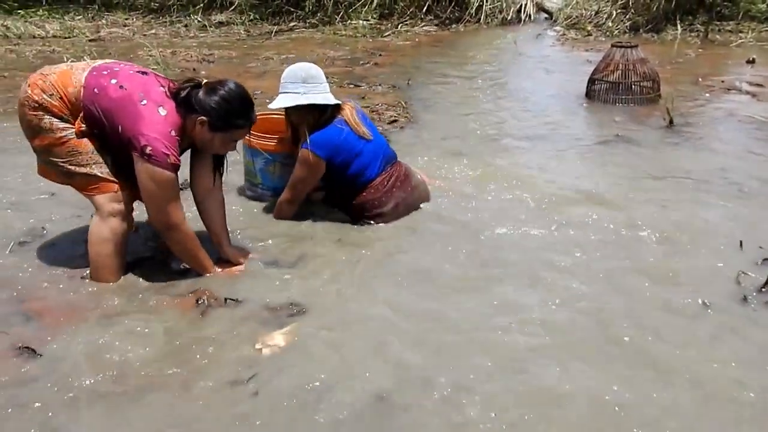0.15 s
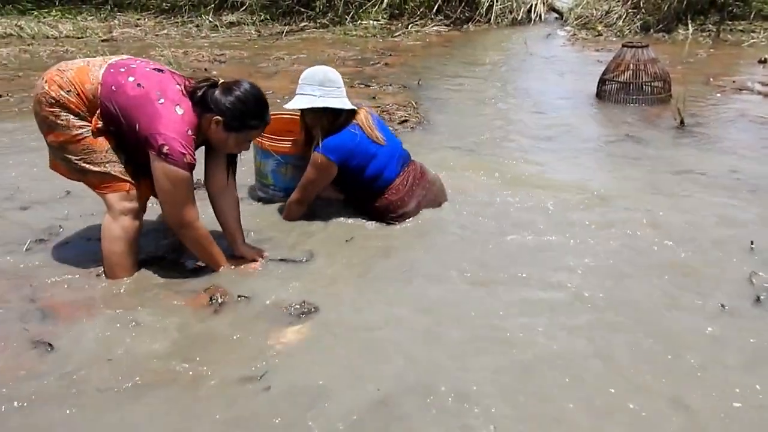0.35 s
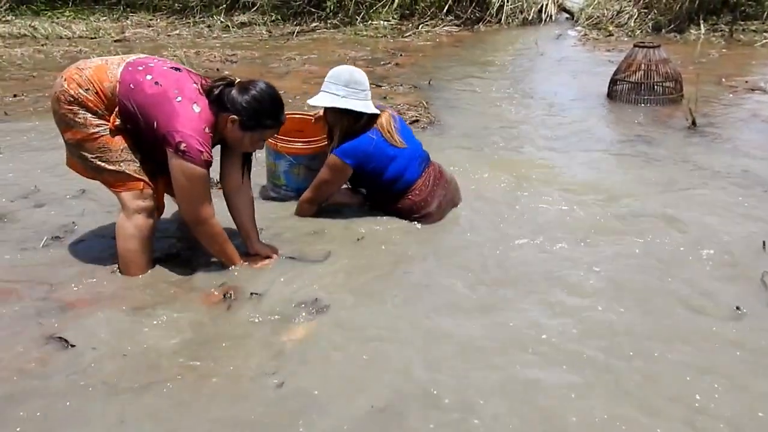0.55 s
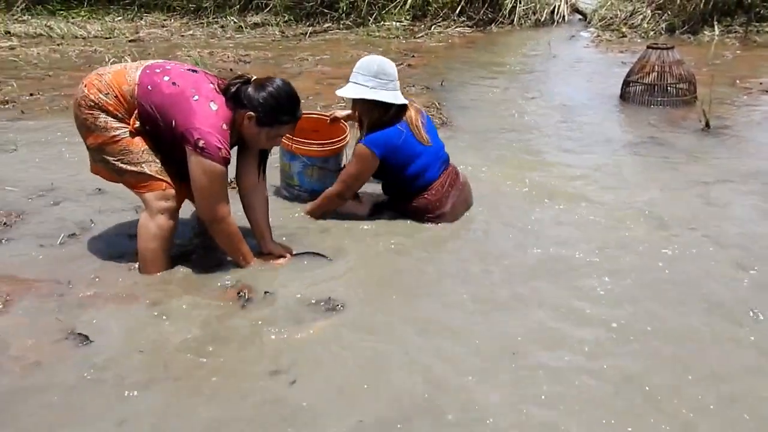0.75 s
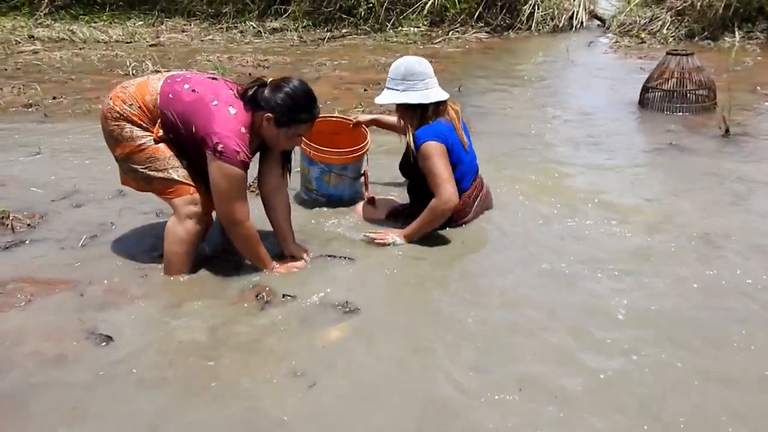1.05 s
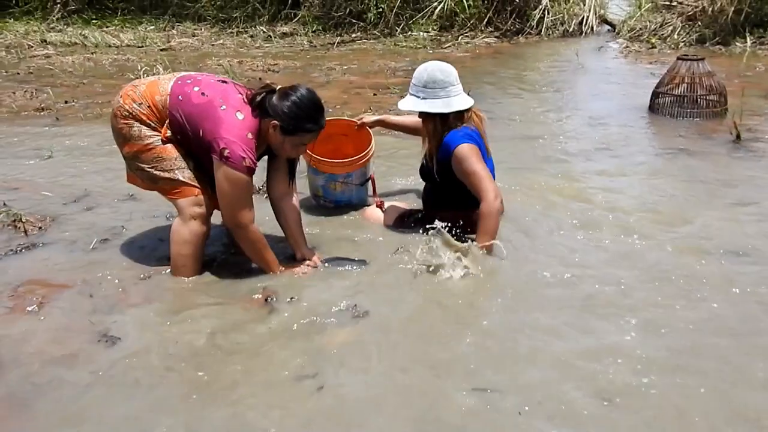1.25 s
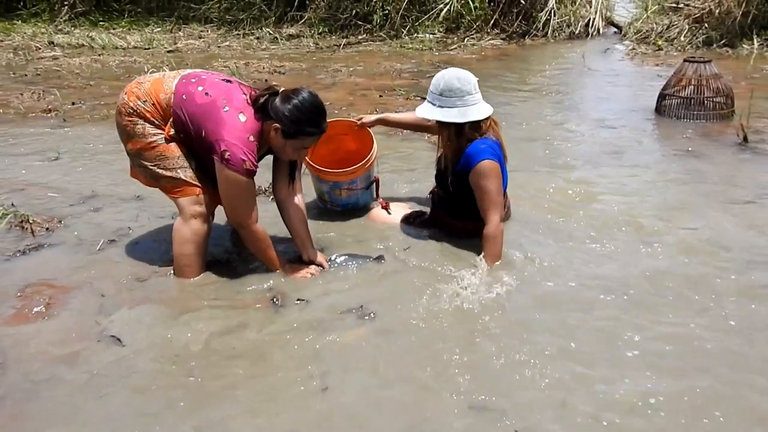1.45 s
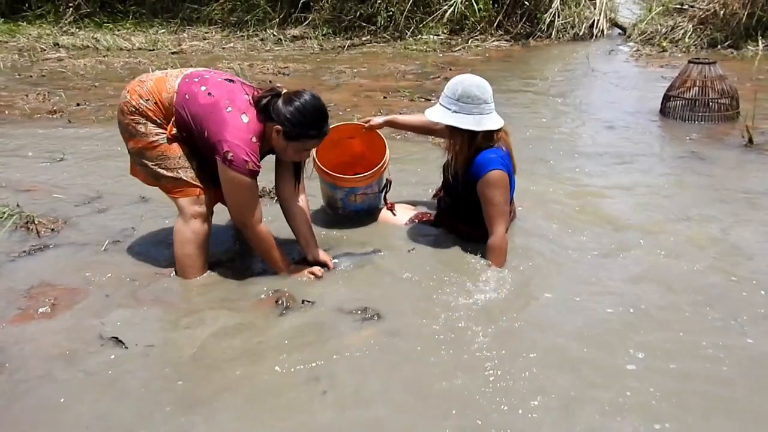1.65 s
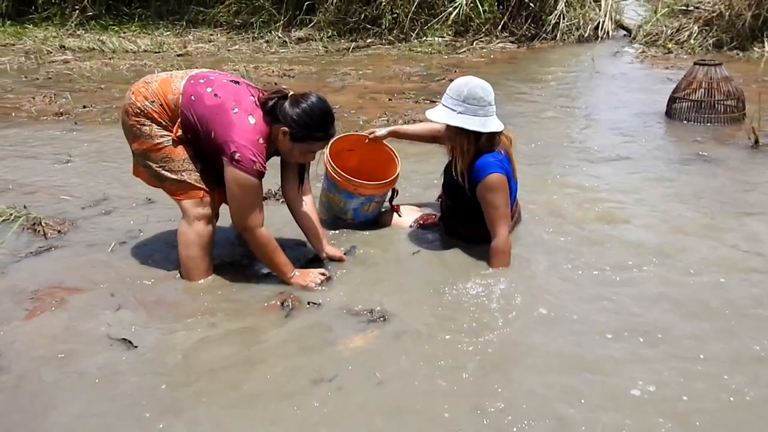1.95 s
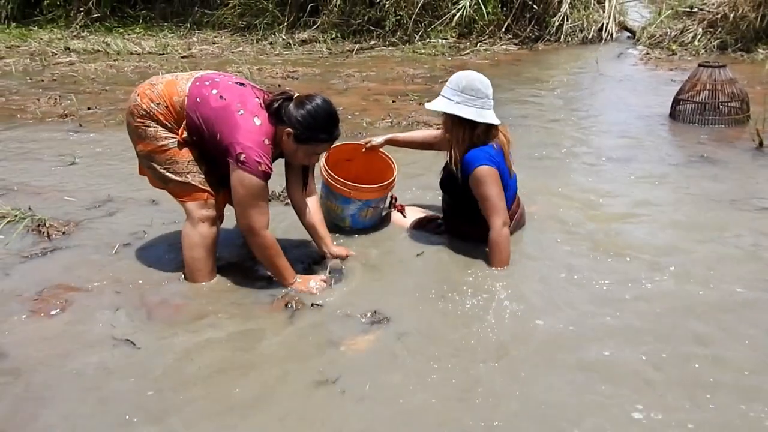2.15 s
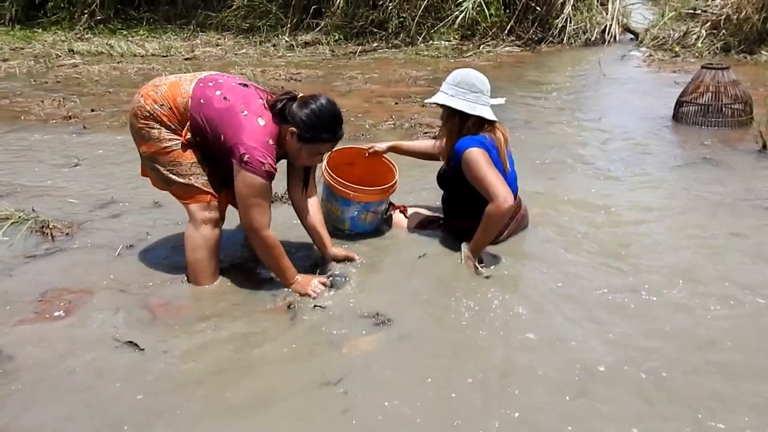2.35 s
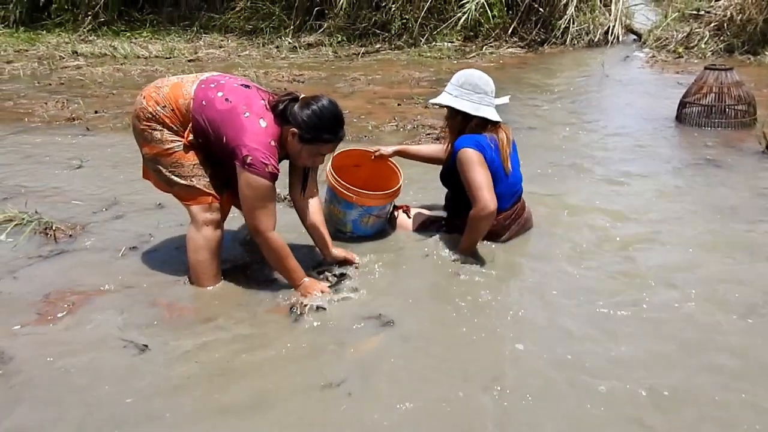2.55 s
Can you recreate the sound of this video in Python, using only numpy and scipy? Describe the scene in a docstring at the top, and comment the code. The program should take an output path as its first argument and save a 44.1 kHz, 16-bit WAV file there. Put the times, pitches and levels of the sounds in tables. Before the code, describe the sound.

Muddy water sloshes and plips under groping hands while low wind thumps swell into a rough gust

```python
"""Shallow muddy water stirred by hands and legs, outdoors: splashes of fine grains, droplets, low
bubbles, a plop and gulps, made of damped sines and upward sweeps, most with a short scattered echo.
Wind buffets two microphone ports: gusts of shaped noise, single thumps, and sharp snaps near the end.
A steady filtered-noise hiss lies beneath; a limiter turns the gain down on strong low-pitched peaks."""
import sys
import numpy as np
from scipy import signal
from scipy.fft import rfft, irfft, next_fast_len
from scipy.io import wavfile
from scipy.ndimage import uniform_filter1d, minimum_filter1d, map_coordinates

SR = 44100
rng = np.random.default_rng(int(sys.argv[2]) if len(sys.argv) > 2 else 0)


def store_wav(level_fs):
    """Save 16-bit WAV to argv[1]."""
    pcm = np.round(np.clip(np.atleast_2d(level_fs), -1, 1) * 32767)
    wavfile.write(sys.argv[1], SR, pcm.T.astype(np.int16))


N = 119070

# Hiss spectrum, relative: (frequency [Hz], density [dB per Hz])
HISS_SPECTRUM = [(150, -22.5), (273, -9), (413, -11), (563, -5), (810, -11), (1110, -8.5), (3400, -9),
                 (6670, -1.5), (15600, -40.5)]
# Left-right correlation of the hiss: (frequency [Hz], correlation [-1 to 1])
HISS_CORRELATION = [(200, 0.84), (1700, 0.86), (5000, 0.73), (12000, 0)]
# Gust level at each port: (time [s], left level [dB], right level [dB])
GUST_LEVELS = [(0, -36, -42.5), (.3, -43, -42), (0.451, -38.5, -36.5), (0.504, -16.5, -29.5),
               (0.629, -32, -20.5), (.68, -29.5, -65), (0.803, -22, -15.5), (.95, -25.5, -32.5),
               (1.08, -25.5, -16.5), (1.178, -22.5, -14.5), (1.23, -34, -38.5), (1.32, -36.5, -22),
               (1.4, -26, -31.5), (1.46, -24, -23), (1.62, -34.5, -24), (1.8, -32.5, -32),
               (1.86, -27.5, -24), (2.05, -32, -30.5), (2.251, -30.5, -24), (2.303, -13.5, -16.5),
               (2.361, -23.5, -35), (2.408, -19.5, -12.5), (2.441, -10.5, -17), (2.562, -6.5, -8),
               (2.59, -31, -7), (2.609, -1, -14), (2.7, -2, -6)]
# Rumble spectrum of the wind, relative: (frequency [Hz], density [dB per Hz])
RUMBLE_SPECTRUM = [(20, -67), (54, 3), (135, 1.5), (209, -8.5), (264, -23), (330, -27), (430, -68)]
# Bright edge of strong gusts, relative: (frequency [Hz], density [dB per Hz])
EDGE_SPECTRUM = [(100, -47), (200, 7.5), (350, -4), (800, -19.5), (2500, -54)]
# Single thumps of wind: (start [s], nominal peak, mean of both ports [dB], left minus right [dB])
WIND_THUMPS = [(0.312, -26, -11), (0.472, -27, -27.5), (0.513, -23, 29), (0.537, -20.5, 15.5),
               (0.711, -16, 3), (0.75, -12.5, -11), (0.835, -4, -10), (0.894, -17, -2), (1.052, -12, -9),
               (1.085, -15.5, -8.5), (1.156, -17.5, -22), (1.421, -14, -5), (1.434, -15.5, -24.5),
               (1.479, -15, -9), (1.527, -13.5, 0), (1.604, -18.5, -11), (1.93, -17, -5), (2.325, -15, 21)]
# Snaps of the windward membrane in the last gust: (time [s], peak [dB])
MEMBRANE_SNAPS = [(2.5025, -11), (2.581, -17), (2.585, -11), (2.6135, -11), (2.623, -9), (2.642, -12),
                  (2.655, -14), (2.673, -12), (2.681, -11)]
# Splashes: (start [s], length [s], rms over the length before colour [dB], median grain pitch [Hz])
SPLASH_CLOUDS = [(0.028, 0.1, -52, 1200), (0.958, 0.08, -45.5, 2595), (1.107, 0.045, -41.5, 5480),
                 (1.228, 0.017, -37.5, 6080), (1.241, 0.21, -42, 1070), (1.398, 0.055, -38.5, 5600),
                 (1.41, 0.076, -38, 2213), (1.454, 0.18, -42, 1110), (1.457, 0.05, -44.5, 5340),
                 (1.575, 0.038, -40, 4450), (2.32, .025, -41.5, 790), (2.345, 0.025, -48, 5620),
                 (2.372, 0.26, -38.5, 1526), (2.498, 0.057, -39.5, 5330), (2.6, 0.064, -38, 2090)]
# Microphone colour on splashes and trickle: (frequency [Hz], gain [dB])
SPRAY_COLOUR = [(1000, 1.5), (3000, 1), (6500, 9.5), (9000, 1.5), (15000, -25)]
# Droplets: (start [s], level before DROP_TRIM_DB [dB], pitch [Hz])
DROPLETS = [(0.0432, -20, 5830), (0.8852, -24, 5270), (0.9092, -23, 4570), (1.016, -19, 4500),
            (1.122, -18, 6860), (1.1428, -16, 6350), (1.234, -18.5, 4620), (1.2869, -12, 6700),
            (1.4108, -11, 7400), (1.4394, -19, 4970), (1.5847, -11, 7800), (1.6037, -17, 7400),
            (2.122, -22, 4850), (2.3082, -20, 3840), (2.319, -19, 3940), (2.3477, -19, 6480),
            (2.361, -7.5, 6320), (2.424, -19.5, 6560), (2.457, -26.5, 3750), (2.494, -13.5, 3020),
            (2.5182, -15.5, 5130), (2.54, -31, 6660), (2.605, -12, 6330)]
# Low bubbles: (start [s], nominal peak [dB], starting pitch [Hz])
LOW_BUBBLES = [(0.043, -34, 975), (0.077, -35, 560), (0.639, -26.5, 970), (0.699, -30, 554),
               (1.136, -26, 1613), (1.285, -31, 1075), (1.318, -20.5, 664), (1.351, -26, 657),
               (1.369, -17.5, 1012), (1.416, -19.5, 1640), (1.43, -21, 1080), (1.47, -26.5, 575),
               (1.516, -26.5, 1116), (1.594, -24.5, 1020), (2.122, -31.5, 545), (2.255, -23, 1770),
               (2.371, -22, 1715), (2.415, -20.5, 1060), (2.467, -32, 1100)]
# A hand enters the water: (start [s], nominal peak [dB], starting pitch [Hz], 60 dB decay [s])
HAND_PLOP = [(1.422, -8, 254, 0.032)]
# Closing cavities: (start [s], length [s], from [Hz], to [Hz], peak [dB], lateness of sweep [exponent])
CAVITY_GULPS = [(.385, .07, 380, 1500, -30.5, 2.3), (2.514, .04, 700, 1700, -24.5, 1.1)]

HISS_DB = -41.5
LUMP_DB, LUMPS_PER_S = 4.5, 28
EDGE_DB, EDGE_REF_GUST_DB = -19, -9.5  # edge level in a gust of the reference level
EDGE_DB_PER_GUST_DB = 1.98
THUMP_HZ, THUMP_WIDTH_CYCLES, THUMP_DELAY_S = 138.8, 0.66, 0.0048  # delay: start to middle
SNAP_HALF_WIDTH_S = .0002

TRICKLE_PER_S, TRICKLE_DB, TRICKLE_HZ = 280, -55.5, 1200
GRAINS_PER_S_PER_HZ = .6  # finer spray is denser
GRAIN_T60_CYCLES = 35
GRAIN_OCTAVES, GRAIN_SCATTER_DB = .85, 5.5  # scales of the random pitch and level
DROP_PARTS, DROP_SPREAD, DROP_SMEAR_S = 5, 0.05, 0.003
DROP_TRIM_DB, DROP_PART_DB, DROP_T60_S = -8.5, -7, 0.016  # part level is relative to the main ping
BUBBLE_T60_CYCLES = 32
RISE = 0.13  # fractional phase stretch at t60: pitch has risen by twice this
ECHO_DB, ECHO_T60_S, ECHO_CORRELATION = -10, .035, 0.62

LIMIT_DB, HOLD_S, GLIDE_S, LAG_S = -5.5, .016, .008, .002
TOP_HZ = 15750


def amp(db):
    """Amplitude from dB."""
    return 10 ** (np.asarray(db) / 20)


def unit(x):
    """x scaled to an rms of 1 over all channels."""
    return x / np.sqrt(np.mean(x ** 2) + 1e-20)


def along(points, hz):
    """Interpolate (frequency [Hz], value) points on a log frequency axis."""
    f, v = np.transpose(points)
    return np.interp(np.log(hz + 1), np.log(f + 1), v)


def wobble(knots_per_s):
    """Two independent smooth random curves."""
    at = np.arange(N) * knots_per_s / SR
    return np.array([map_coordinates(rng.standard_normal(1000), [at]) for _ in range(2)])


def filtered(x, response):
    """Filter x by a zero-phase gain given as a function of Hz."""
    m = next_fast_len(N + SR // 2)
    return irfft(rfft(x, m) * response(np.fft.rfftfreq(m, 1 / SR)), m)[..., :N]


def rush(spectrum, correlation):
    """Stereo noise of rms 1; the mid-side balance sets the left-right correlation."""
    def mid_side_gain(hz):
        angle = np.arccos(np.clip(along(correlation, hz), -1, 1)) / 2
        return amp(along(spectrum, hz)) * [np.cos(angle), np.sin(angle)]

    mid, side = filtered(rng.standard_normal((2, N)), mid_side_gain)
    return unit(np.array([mid + side, mid - side]))


def pings(s, db, hz, t60, size):
    """Sum of damped sines, each with a soft start and a rising pitch."""
    s, db, hz, t60 = (np.asarray(c)[:, None] for c in (s, db, hz, t60))
    t = np.arange(size) / SR
    envelope = amp(db - 60 * t / t60) * (1 - np.exp(-t * hz))
    wave = envelope * np.sin(2 * np.pi * hz * t * (1 + RISE * t / t60))
    at = np.round(s * SR).astype(int) + np.arange(size)
    return np.bincount(at.ravel(), wave.ravel(), N + SR)[:N]


def hiss():
    """Steady shaped noise, less alike left to right in the treble."""
    return amp(HISS_DB) * rush(HISS_SPECTRUM, HISS_CORRELATION)


def gusts(gust_db):
    """Lumpy rumble, weakly related at the ports; the edge grows faster than the gust."""
    rumble = unit(amp(LUMP_DB * wobble(LUMPS_PER_S)) * rush(RUMBLE_SPECTRUM, [(100, 0.28)]))
    edge = unit(amp(LUMP_DB * wobble(2 * LUMPS_PER_S)) * rush(EDGE_SPECTRUM, [(100, 0.017)]))
    edge_db = EDGE_DB + EDGE_DB_PER_GUST_DB * (gust_db - EDGE_REF_GUST_DB)
    return amp(gust_db) * rumble + amp(edge_db) * edge


def thumps():
    """Short pressure pulses: Gaussian-windowed cosines, random phase at each port."""
    t, out = np.arange(N) / SR, np.zeros((2, N))
    for (s, db, pan_db), turn in zip(WIND_THUMPS, rng.random((len(WIND_THUMPS), 2))):
        cycles = (t - s - THUMP_DELAY_S) * THUMP_HZ
        window = np.exp(-(cycles / THUMP_WIDTH_CYCLES) ** 2) * (np.abs(cycles) < 3)
        port_db = db + pan_db * np.array([[.5], [-.5]])
        out += amp(port_db) * window * np.cos(2 * np.pi * (cycles + turn[:, None]))
    return out


def snaps(gust_db):
    """Narrow negative spikes of suction on the port with the stronger wind."""
    t, out = np.arange(N) / SR, np.zeros((2, N))
    windward = gust_db == gust_db.max(0)
    for s, db in MEMBRANE_SNAPS:
        spike = amp(db) / (1 + ((t - s) / SNAP_HALF_WIDTH_S) ** 2)
        out -= spike * windward[:, [round(s * SR)]]
    return out


def wind():
    """Gusts, thumps and snaps as air pressure on the two ports."""
    s, *levels = np.transpose(GUST_LEVELS)
    gust_db = np.array([np.interp(np.arange(N) / SR, s, db) for db in levels])
    return gusts(gust_db) + thumps() + snaps(gust_db)


def spray(start, length, db, hz, per_s):
    """A cloud of tiny ringing bubbles, swelling quickly and fading."""
    when, pitch_draw, level_draw = rng.random((1200, 3))[:int(per_s * length) + 1].T
    octaves = GRAIN_OCTAVES * np.log(pitch_draw / (1 - pitch_draw)) / 2
    pitch = np.clip(hz * 2 ** octaves, 520, 10500)
    swell_db = 10 * np.log10(np.sin(np.pi * when ** 0.79) + 0.087)
    grain_db = swell_db - GRAIN_SCATTER_DB * np.log(level_draw + 0.072)
    x = pings(start + length * when, grain_db, pitch, GRAIN_T60_CYCLES / pitch, size=500)
    return amp(db) * unit(x) * np.sqrt(length * SR / N)  # whole-scene rms to rms over the length


def trickle():
    """Small water everywhere: one sparse cloud over the whole scene."""
    return spray(0, N / SR, TRICKLE_DB, TRICKLE_HZ, TRICKLE_PER_S)


def splashes():
    """Short dense clouds of spray."""
    return sum(spray(*row, GRAINS_PER_S_PER_HZ * row[-1]) for row in SPLASH_CLOUDS)


def droplets():
    """Each droplet breaks into one ping and weaker detuned neighbours just after it."""
    s, db, hz = np.transpose(DROPLETS)[:, :, None]
    u = rng.random((len(DROPLETS), 2, DROP_PARTS)) * (np.arange(DROP_PARTS) > 0)
    late, detune_draw = u[:, 0], u[:, 1]
    neighbour = late > 0
    part_s = s + DROP_SMEAR_S * late
    part_db = db + DROP_TRIM_DB + DROP_PART_DB * neighbour
    detune = DROP_SPREAD * np.tan(np.pi * .8 * (detune_draw - .5)) * neighbour
    parts = part_s, part_db, hz * (1 + detune)
    return pings(*(p.ravel() for p in parts), np.full(late.size, DROP_T60_S), size=2000)


def bubbles():
    """Low air bubbles: damped sines that die in a fixed number of cycles."""
    s, db, hz = np.transpose(LOW_BUBBLES)
    return pings(s, db, hz, BUBBLE_T60_CYCLES / hz, size=5000)


def plop():
    """A hand enters the water: one low damped sine."""
    return pings(*np.transpose(HAND_PLOP), size=5000)


def gulp(start, length, lo_hz, hi_hz, db, bend):
    """The pitch sweeps up as the cavity closes, loudest midway."""
    u = np.clip((np.arange(N) / SR - start) / length, 0, 1)
    phase = 2 * np.pi * np.cumsum(lo_hz * (hi_hz / lo_hz) ** u ** bend) / SR
    swell_db = -14 * np.abs(np.sin(np.pi * (u - .5))) ** 1.2
    fade = np.abs(np.sin(np.pi * u)) ** 0.11 * (u > 0) * (u < 1)
    return amp(db + swell_db) * fade * np.sin(phase)


def echo(x):
    """Scatter off the water and the banks: decaying stereo noise convolved with x."""
    t = np.arange(SR // 8) / SR
    mid, side = rng.standard_normal((2, len(t))) * amp(-60 * t / ECHO_T60_S)
    side_gain = np.sqrt((1 - ECHO_CORRELATION) / (1 + ECHO_CORRELATION))
    tail = mid + np.array([[1], [-1]]) * side_gain * side
    return amp(ECHO_DB) * signal.fftconvolve(x[None], tail / np.linalg.norm(tail[0]), axes=1)[:, :N]


def water():
    """All water sounds; the gulps alone have no echo."""
    foam = filtered(splashes() + trickle(), lambda hz: amp(along(SPRAY_COLOUR, hz)))
    direct = foam + droplets() + plop() + bubbles()
    return direct + sum(gulp(*row) for row in CAVITY_GULPS) + echo(direct)


def scene():
    """Water, wind and hiss."""
    return water() + wind() + hiss()


def record(dry):
    """A linked limiter, deaf to the shortest peaks, then the band limit."""
    heard = np.abs(uniform_filter1d(dry, int(LAG_S * SR))).max(0)
    need = np.minimum(1, amp(LIMIT_DB) / (heard + 1e-9))
    held = minimum_filter1d(need, int(HOLD_S * SR) + 1)  # centred: acts before and after a peak
    gain = uniform_filter1d(held, int(GLIDE_S * SR) + 1)
    return filtered(dry * gain, lambda hz: hz < TOP_HZ)


dry = scene()
out = record(dry)
store_wav(out)
```